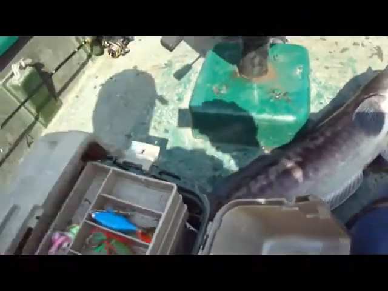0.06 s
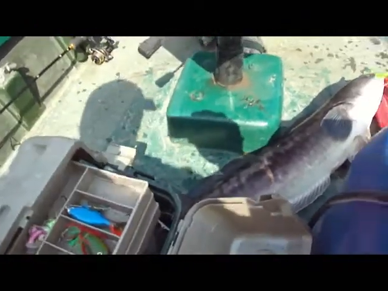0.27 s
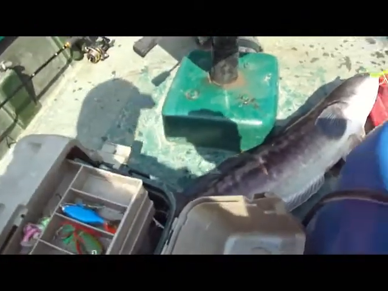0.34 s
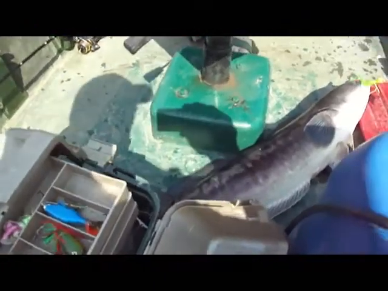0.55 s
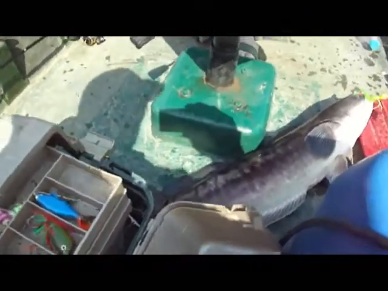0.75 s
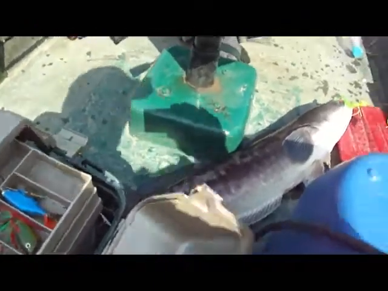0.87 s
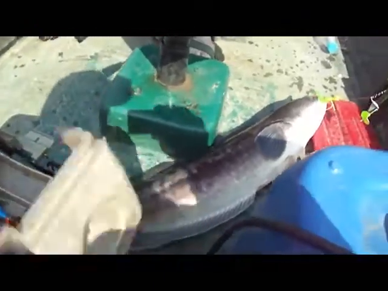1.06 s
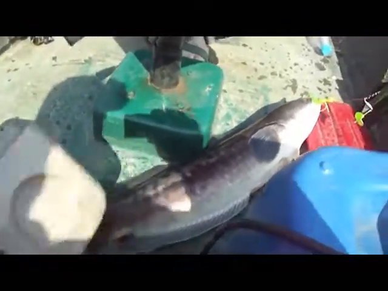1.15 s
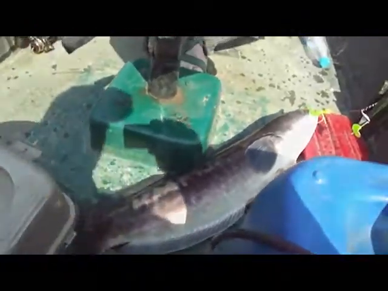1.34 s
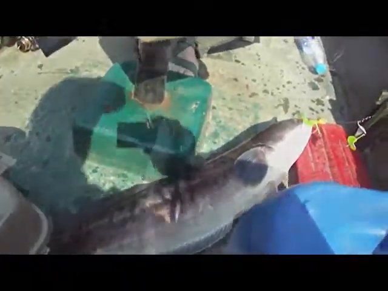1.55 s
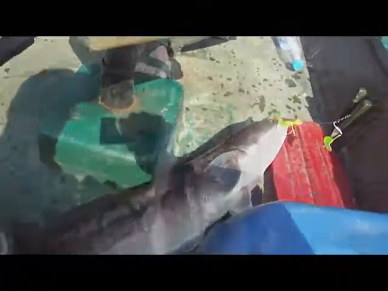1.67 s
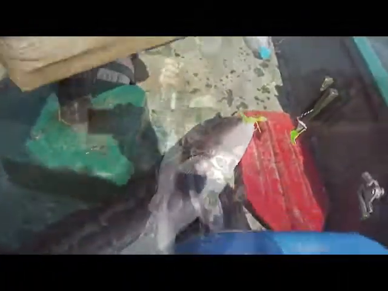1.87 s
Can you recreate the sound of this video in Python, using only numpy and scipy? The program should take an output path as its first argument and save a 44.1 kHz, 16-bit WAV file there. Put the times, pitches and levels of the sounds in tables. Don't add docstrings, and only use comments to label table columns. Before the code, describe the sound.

A heavy fish slams hard on a boat deck, rattling a plastic tackle box and hooks

```python
import sys
import numpy as np
from scipy import signal
from scipy.fft import rfft, irfft, next_fast_len
from scipy.io import wavfile
from scipy.ndimage import map_coordinates

SR = 44100
rng = np.random.default_rng(int(sys.argv[2]) if len(sys.argv) > 2 else 0)


def file_out(sig):
    cols = np.atleast_2d(sig).T
    lim = np.clip(cols, -1, 1)
    pcm = np.round(lim * 32767).astype(np.int16)
    wavfile.write(sys.argv[1], SR, pcm)


def gain_from_db(level_db):
    decades = np.asarray(level_db, float) / 20
    return 10 ** decades


N = 83790
T = np.arange(N) / SR


def unit(x):
    return x / np.sqrt(np.mean(x ** 2) + 1e-20)


def along(points):
    point_hz, point_db = np.transpose(points)
    return lambda hz: gain_from_db(np.interp(np.log(hz + 1), np.log(point_hz + 1), point_db))


def filtered(x, response):
    size = next_fast_len(len(x) + 8192)
    spectrum = rfft(x, size) * response(np.fft.rfftfreq(size, 1 / SR))
    return irfft(spectrum, size)[:len(x)]


def peak(hz, width_hz):
    return lambda f: 1j * f * width_hz / (hz * hz - f * f + 1j * f * width_hz)


def wobble(rate):
    return map_coordinates(rng.standard_normal(int(N * rate / SR) + 4), [T * rate])


def level(rows):
    return gain_from_db(np.interp(T, *np.transpose(rows)))


def water_and_air():
    # point_hz, gain_db
    air_colour = [(100, -40), (200, -8.5), (600, -9), (950, -11.5), (3400, -21), (10500, -35.5)]
    # time_s, level_db
    air_level = [(0, -47.5), (.5, -44.5), (.9, -46.5), (1.2, -44), (1.6, -47), (1.9, -48.5)]
    hiss = unit(filtered(rng.standard_normal(N), along(air_colour))) * gain_from_db(wobble(40.1))
    patches = rng.standard_normal(N) * gain_from_db(3 * wobble(59.8))
    laps = unit(filtered(patches, lambda f: peak(750, 900)(f) ** 2))
    return level(air_level) * (gain_from_db(-2.0) * hiss + gain_from_db(-10.5) * laps)


def wind():
    # point_hz, gain_db
    gust_colour = [(30, -14), (70, -2.5), (130, 0.5), (400, -42.5)]
    # time_s, level_db
    wind_level = [(0, -58.5), (.7, -58.5), (.76, -66), (.98, -70.5), (1.05, -52), (1.2, -66), (1.55, -48.5),
                  (1.65, -40), (1.9, -55.5)]
    lumps = filtered(rng.standard_normal(N), along(gust_colour)) * gain_from_db(2.7 * wobble(35.04))
    return level(wind_level) * unit(lumps)


def wind_bumps():
    # middle_s, level_db, pitch_hz
    bump_rows = [(0.136, -38, 113), (0.5, -37.5, 104), (0.561, -40, 127), (0.621, -46.5, 117),
                 (1.123, -46.5, 79.4), (1.167, -40, 110), (1.477, -36, 110), (1.585, -28, 157),
                 (1.622, -29, 134), (1.647, -27, 151), (1.662, -29, 153), (1.694, -29.5, 180),
                 (1.781, -37, 125), (1.801, -31.5, 150), (1.838, -37, 131), (1.886, -32, 130)]
    cycles = 0.43
    out = np.zeros(N)
    for middle_s, db, hz in bump_rows:
        t = T - middle_s
        out += gain_from_db(db) * np.exp(-.5 * (t * hz / cycles) ** 2) * np.cos(2 * np.pi * hz * t + 1.86)
    return out


def water_drop():
    # start_s, level_db, first_hz, last_hz, glide_s, length_s
    plop = (1.7215, -34, 620, 950, .004, .036)
    start_s, db, first_hz, last_hz, glide_s, length_s = plop
    t = np.clip(T - start_s, 0, None)
    pitch_hz = last_hz + (first_hz - last_hz) * np.exp(-t / glide_s)
    phase = 2 * np.pi * np.cumsum(pitch_hz) / SR

    def swell(span_s):
        return np.sin(np.pi * np.clip(t / span_s, 0, 1) ** .6)

    bubble = swell(length_s) * np.sin(phase)
    undertone = .5 * swell(length_s / 2) * np.sin(phase / 2)
    return gain_from_db(db + 2 * wobble(150)) * (bubble + undertone)


def steel_fittings():
    # start_s, level_db
    strike = (.305, -35.5)
    # pitch_hz, level_db, t60_s
    steel_modes = [(3548, 3, .25), (4145, -9, .4), (4301, -1, .2), (6180, -11, .6), (6395, -12, .7),
                   (9620, -6, .25)]
    start_s, strike_db = strike
    t = np.clip(T - start_s, 0, None)
    rise = np.minimum(t / .03, 1)
    out = np.zeros(N)
    for hz, db, t60_s in steel_modes:
        decay = gain_from_db(strike_db + db + 3.5 * wobble(45) - 60 * t / t60_s)
        out += decay * rise * np.sin(2 * np.pi * hz * t)
    return out


def singing_lure():
    # start_s, length_s, level_db, pitch_hz
    spells = [(.43, .125, -57, 4150), (.712, .2, -58, 4150), (1.005, .185, -55, 4150),
              (.55, .47, -67, 4150), (.495, .035, -61, 6380), (.54, .035, -65, 6380), (.62, .1, -64, 6380),
              (.74, .22, -70, 6370), (.6, .08, -68, 9620), (1.88, .04, -54, 3880), (1.6, .028, -55, 6500)]
    edge_s = .012
    out = np.zeros(N)
    for start_s, length_s, db, hz in spells:
        gate = np.clip(np.minimum(T - start_s, start_s + length_s - T) / edge_s, 0, 1)
        tone = np.sin(2 * np.pi * hz * T + .4 * wobble(30))
        out += gain_from_db(db + 3 + 1.5 * wobble(25)) * gate * tone
    return out


def hand_scuffs():
    # middle_s, half_length_s, level_db, pitch_hz
    rubs = [
        (0.168, 0.013, -45, 873),
        (0.174, 0.0052, -40, 367),
        (0.69, 0.014, -36, 628),
        (0.697, .024, -40, 830),
        (0.685, 0.023, -44.5, 1910),
        (0.753, 0.013, -48.5, 840),
        (1.043, 0.06, -45, 630),
        (1.253, 0.036, -49, 940),
        (1.46, 0.025, -53, 6250),
        (1.57, .012, -53, 6400),
    ]
    resonance_q = 8.3
    out = np.zeros(N)
    for middle_s, half_s, db, hz in rubs:
        grit = rng.standard_normal(N) * gain_from_db(2.7 * wobble(330))
        rub = unit(filtered(grit, peak(hz, min(hz / resonance_q, 350))))
        out += gain_from_db(db) * np.exp(-.5 * ((T - middle_s) / half_s) ** 2) * rub
    return out


def knocks(rows, cycles, crack_s, spread, bright=0):
    # point_hz, gain_db
    crack_colour = [(300, -3.5), (1000, 3.5), (3000, 0), (6000, -10), (11000, -25.5)]
    ring_rise_s, crack_rise_s = 0.00014, 0.00059
    out, t = np.zeros(N + SR), np.arange(SR // 10) / SR

    def crack_response(f):
        return along(crack_colour)(f) * (1 + f / 3000) ** bright

    for start_s, db, hz, crack_db in rows:
        detune = np.exp(spread * rng.standard_normal(2))
        modes = [(1, -1), (1.49 * detune[0], .35), (2.766 * detune[1], .25)]
        ring = sum(gain * np.sin(2 * np.pi * hz * ratio * t) for ratio, gain in modes)
        ring = ring * gain_from_db(-60 * t * hz ** 0.51 * 12 / cycles) * (1 - np.exp(-t / ring_rise_s))
        crack = unit(filtered(rng.standard_normal(len(t)), crack_response))
        crack = crack * gain_from_db(crack_db - 60 * t / crack_s) * np.minimum(t / crack_rise_s, 1)
        out[round(start_s * SR):][:len(t)] += gain_from_db(db) * (ring + crack)
    return out[:N]


def hook_ticks():
    # start_s, peak_db, pitch_hz, crack_db
    tick_rows = [(.199, -49.5, 2460, 7), (.4205, -45, 1720, 8), (.4265, -30.5, 2930, 3),
                 (.4273, -33.5, 4580, -10), (.555, -38.5, 820, -2.5), (.5785, -37.5, 1080, 5.5),
                 (.5985, -32.5, 2160, 4), (1.1065, -26.5, 1100, -19), (1.1145, -22, 1220, -9),
                 (1.1148, -29.5, 2070, -8.5), (1.118, -20.5, 690, -29), (1.127, -34.5, 5860, -1),
                 (1.2335, -23, 1712, -5), (1.235, -28.5, 956, -15), (1.3055, -31, 2750, -1.5),
                 (1.329, -27, 820, -6), (1.342, -35, 2650, 4.5)]
    return knocks(tick_rows, cycles=11.4, crack_s=0.027, spread=0.045, bright=0.74)


def grains(colour, rate):
    size_scatter_db, life_cycles = 2, 12
    count = int(rate * N / SR)
    place, pitch, luck = np.split(rng.random((count, 3)), 3, axis=1)
    low_hz, high_hz = colour[0][0], colour[-1][0]
    hz = low_hz * (high_hz / low_hz) ** pitch
    t = np.arange(400) / SR
    size = along(colour)(hz) * np.sqrt(hz) * gain_from_db(-size_scatter_db * np.log(luck + 1e-9))
    decay = np.exp(-t * hz * 3 / life_cycles) * np.hanning(800)[400:]
    rings = size * np.sin(2 * np.pi * hz * t) * decay * np.minimum(t * hz, 1)
    samples = (place * N).astype(int) + np.arange(400)
    return unit(np.bincount(samples.ravel(), rings.ravel())[:N])


def loose_clatter():
    # start_s, rise_s, hold_s, t60_s, box_db, tackle_db
    shakes = [
        (0.221, 0.039, 0.042, 0.2, -17, -27),
        (0.273, 0.0092, 0.023, 0.34, -35, -38),
        (1.388, 0.007, 0.031, 0.31, -22, -39),
        (1.507, 0.0094, 0.039, 0.16, -20.5, -41),
        (1.554, 0.01, 0.059, 0.077, -30, -52),
    ]
    # point_hz, gain_db
    box_colour = [(150, 13), (300, -0.5), (700, 0.5), (1400, -6.5), (3500, -15)]
    # point_hz, gain_db
    tackle_colour = [(1500, -10), (3700, -0.5), (5200, -5.5), (6600, -5), (8000, -15.5), (11000, -13)]
    box_shake, tackle_shake = np.zeros(N), np.zeros(N)
    for start_s, rise_s, hold_s, t60_s, box_db, tackle_db in shakes:
        rise = np.clip((T - start_s) / rise_s, 0, 1)
        fall_db = -60 * np.clip(T - start_s - hold_s, 0, None) / t60_s
        box_shake += rise * gain_from_db(box_db + fall_db)
        tackle_shake += rise * gain_from_db(tackle_db + fall_db)
    return grains(box_colour, 4000) * box_shake + grains(tackle_colour, 6500) * tackle_shake


def swings(rows, swell_s, shorter):
    out, t = np.zeros(N + SR), np.arange(SR // 10) / SR
    for start_s, db, hz in rows:
        u = t / swell_s * (hz / 500) ** shorter
        out[round(start_s * SR):][:len(t)] -= gain_from_db(db + 3) * u * np.exp(1 - u) * np.sin(2 * np.pi * hz * t)
    return out[:N]


def hook_jingle():
    # start_s, level_db, pitch_hz
    jingles = [
        (.304, -33.5, 6960),
        (.307, -43, 4180),
        (.312, -38.5, 6540),
        (.332, -50, 5460),
        (.344, -49, 4150),
        (.351, -43.5, 5400),
    ]
    return swings(jingles, swell_s=0.0018, shorter=0)


def ringing_panels():
    # start_s, level_db, pitch_hz
    first_panels = [(0.226, -43, 2170), (0.228, -10, 307), (0.228, -15, 1187), (0.232, -8.5, 796),
                    (0.234, -29.5, 1840), (0.234, -15.5, 332), (0.244, -16, 478), (0.244, -13.5, 1040),
                    (0.245, -21.5, 2310), (0.245, -13, 238), (0.251, -18.5, 1340), (0.251, -22, 1840),
                    (0.253, -20, 850), (0.255, -13.5, 384), (0.258, -29, 1737), (0.26, -32, 890),
                    (0.265, -26, 1570), (0.266, -29, 920), (0.266, -19.5, 597), (0.268, -26, 1956),
                    (0.272, -12.5, 213), (0.273, -22.5, 1090), (0.281, -25, 267), (0.284, -29, 2000),
                    (0.285, -19.5, 770), (0.287, -40, 1130), (0.288, -33, 1640), (0.29, -22, 532),
                    (0.293, -28, 1540), (0.306, -28.5, 390), (0.307, -35, 1770), (0.31, -28.5, 830),
                    (0.315, -38, 1570), (0.321, -28, 736), (0.334, -30.5, 760), (0.343, -38, 2080),
                    (0.367, -41, 1060), (0.368, -38, 740), (0.369, -40.5, 2040), (0.387, -38.5, 750)]
    # start_s, level_db, pitch_hz
    later_panels = [(1.381, -34, 2200), (1.381, -39, 1900), (1.383, -27, 1196), (1.384, -10.5, 422),
                    (1.389, -23.5, 1820), (1.389, -24.5, 2106), (1.39, -32, 1203), (1.397, -18.5, 250),
                    (1.408, -11.5, 256), (1.409, -27, 690), (1.416, -22, 670), (1.419, -26, 335),
                    (1.42, -32, 1940), (1.421, -28, 1385), (1.427, -40, 1040), (1.428, -33, 670),
                    (1.435, -39, 1790), (1.437, -23.5, 510), (1.438, -30, 1355), (1.445, -22, 264),
                    (1.446, -36, 1650), (1.449, -31, 1460), (1.451, -24.5, 690), (1.453, -22, 241),
                    (1.465, -29, 610), (1.471, -35.5, 1430), (1.475, -30, 593), (1.489, -22, 238),
                    (1.498, -21, 245), (1.511, -30, 1180), (1.511, -12, 321), (1.522, -11, 240),
                    (1.522, -23.5, 1180), (1.525, -25, 750), (1.535, -13.5, 239), (1.535, -31, 2140),
                    (1.535, -36, 1210), (1.536, -36, 1680), (1.537, -14, 618), (1.541, -35, 1250),
                    (1.552, -17.5, 216), (1.555, -25.5, 640), (1.563, -34, 970), (1.566, -20.5, 480),
                    (1.569, -37, 1050), (1.569, -41.5, 1850), (1.574, -36, 1430), (1.576, -24.5, 530),
                    (1.579, -23, 267), (1.583, -23.5, 634), (1.592, -20, 815), (1.593, -35, 520),
                    (1.597, -19, 166), (1.606, -24, 510), (1.619, -22.5, 170)]
    return swings(list(first_panels) + list(later_panels), swell_s=0.0025, shorter=.05)


def fish_blows():
    # start_s, peak_db, pitch_hz, crack_db
    blow_rows = [(.2262, -17, 300, -25), (.2290, -12, 800, -3), (.2448, -14, 1020, -6),
                 (.2565, -18, 430, -2), (.2715, -10, 215, -8), (.2945, -24, 780, -4), (1.3822, -5, 490, -9),
                 (1.3845, -8, 215, -25), (1.3912, -12, 640, -3), (1.3965, -11, 205, -19),
                 (1.409, -21, 700, -8), (1.4185, -16, 210, -12), (1.5110, -6, 300, -17),
                 (1.5352, -12, 630, -3), (1.560, -25, 700, -6), (1.5935, -9, 600, -13)]
    return knocks(blow_rows, cycles=7.4, crack_s=0.023, spread=.05)


def hull_echo(close):
    t = np.arange(SR // 8) / SR
    hull = rng.standard_normal(len(t)) * gain_from_db(-60 * t / 0.13) * (t > .003)
    return gain_from_db(-15) * signal.fftconvolve(close, hull / np.linalg.norm(hull))[:N]


def scene():
    mic_hz = 110
    slams = fish_blows() + ringing_panels() + hook_jingle()
    close = slams + loose_clatter() + hook_ticks() + hand_scuffs()
    close = filtered(close, lambda f: (1j * f / (mic_hz + 1j * f)) ** 4)
    metal = steel_fittings() + singing_lure()
    outdoors = water_and_air() + wind() + wind_bumps()
    return (close + hull_echo(close) + metal + water_drop() + outdoors)[None]


def band_limit(x):
    return signal.sosfilt(signal.butter(12, 12150, fs=SR, output="sos"), x)


def record(dry):
    limit, top_hz, edge_db, end_hz = .72, 11050, -25, 12150
    limited = dry[0] / (1 + np.abs(dry[0] / limit) ** 10) ** (1 / 10)
    finished = filtered(limited, lambda hz: np.where(hz < top_hz, 1, gain_from_db(edge_db) * (hz < end_hz)))
    return band_limit(finished[None])


dry = scene()
out = record(dry)
file_out(out)
```